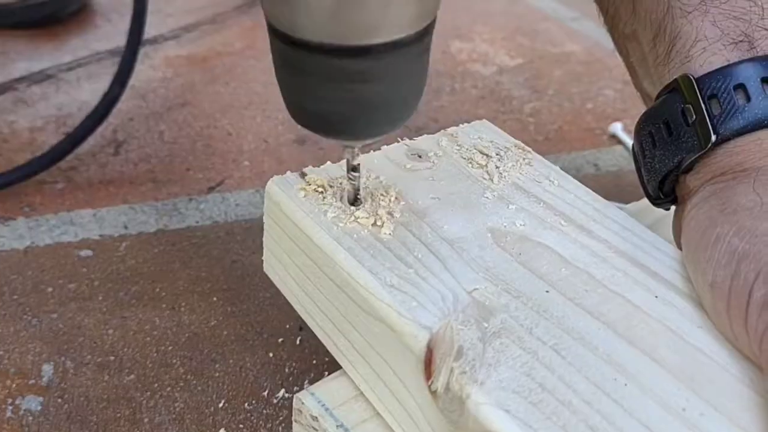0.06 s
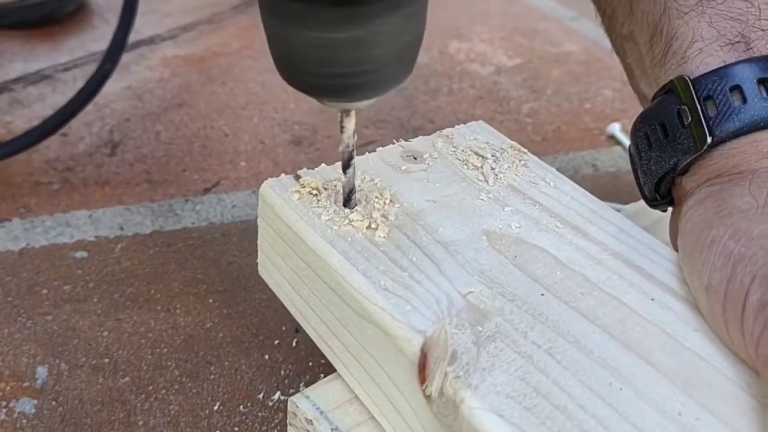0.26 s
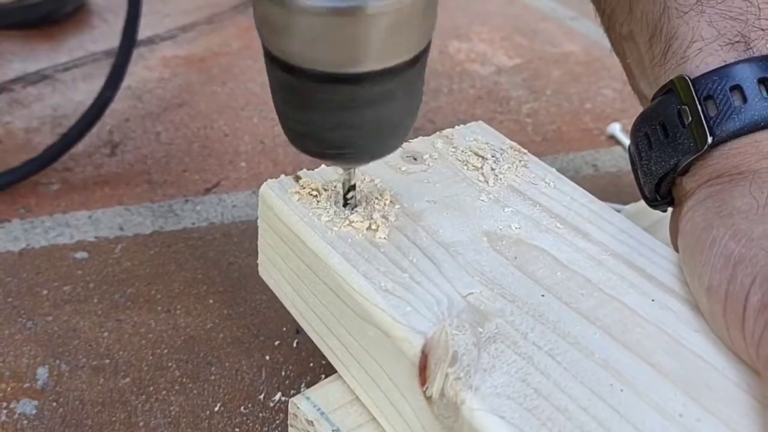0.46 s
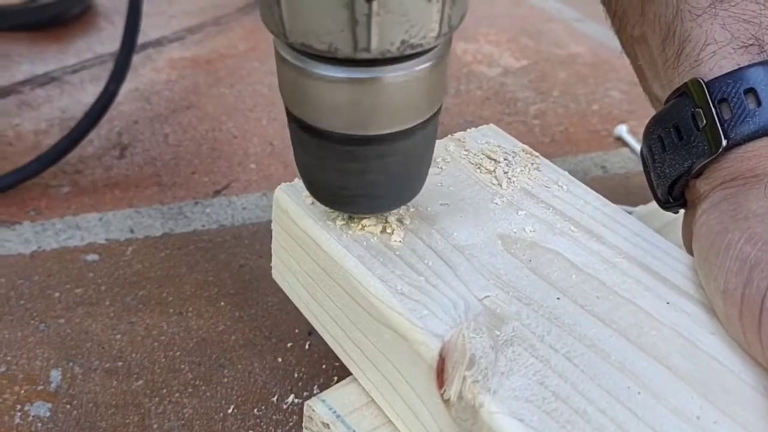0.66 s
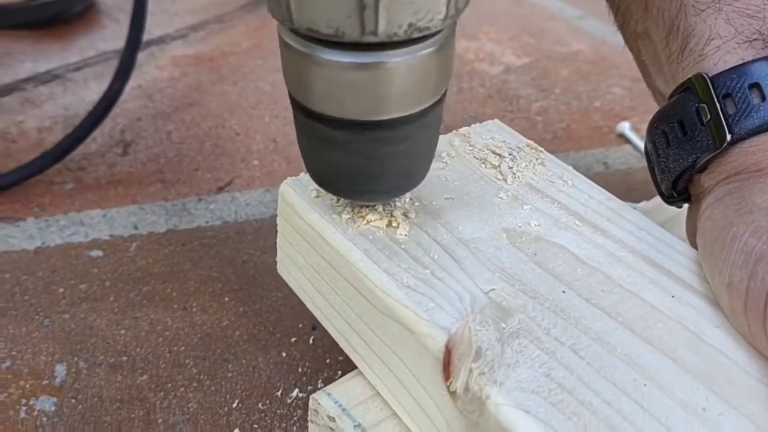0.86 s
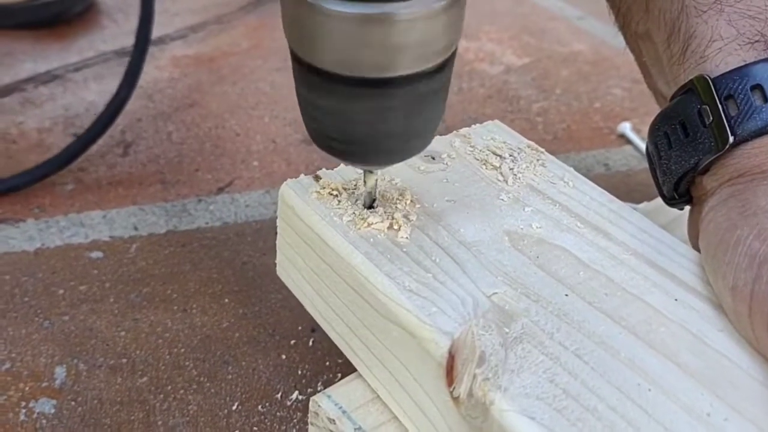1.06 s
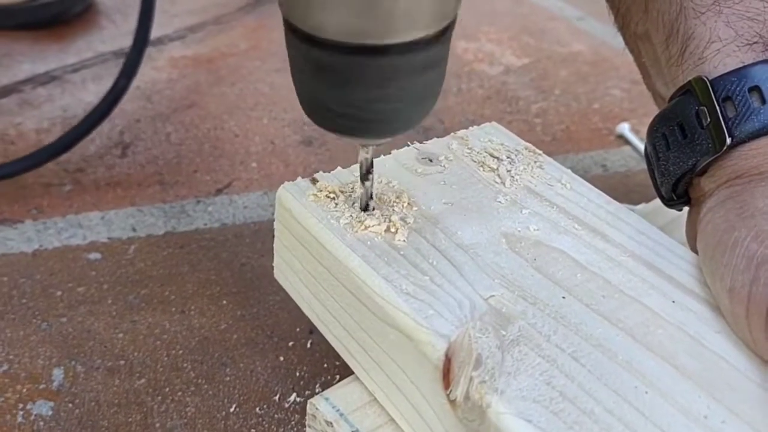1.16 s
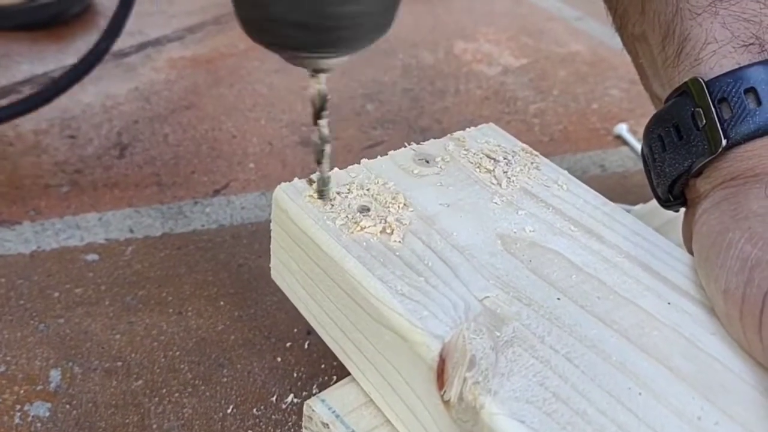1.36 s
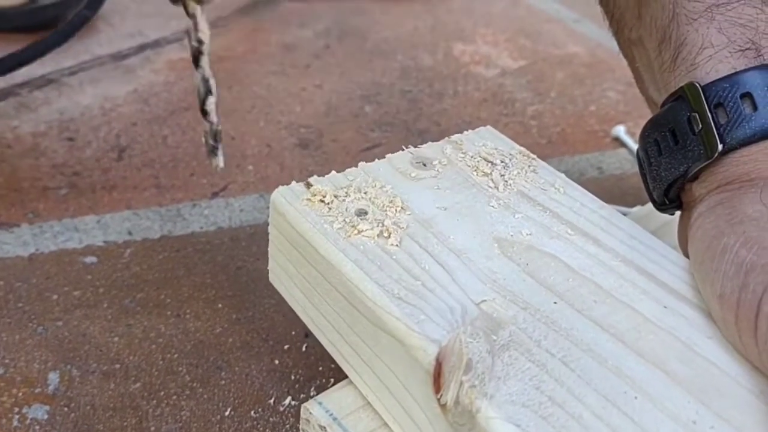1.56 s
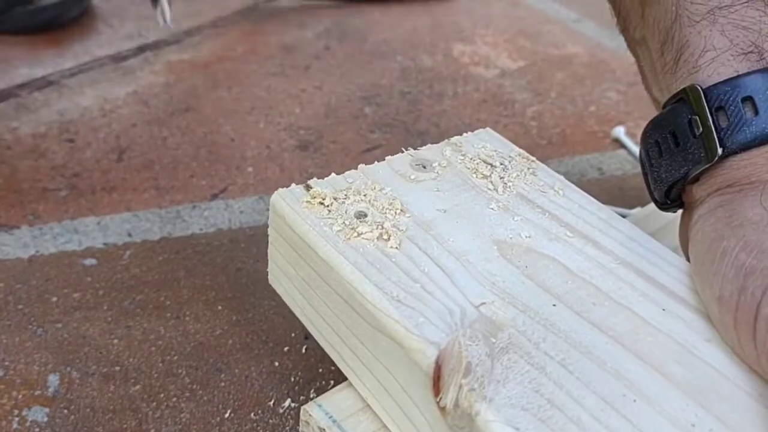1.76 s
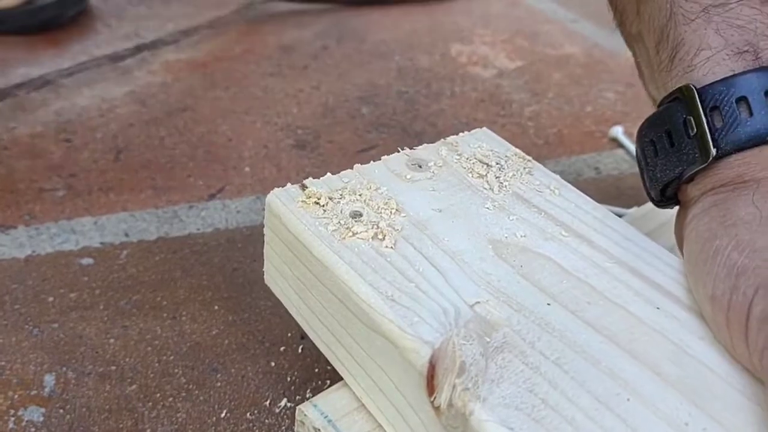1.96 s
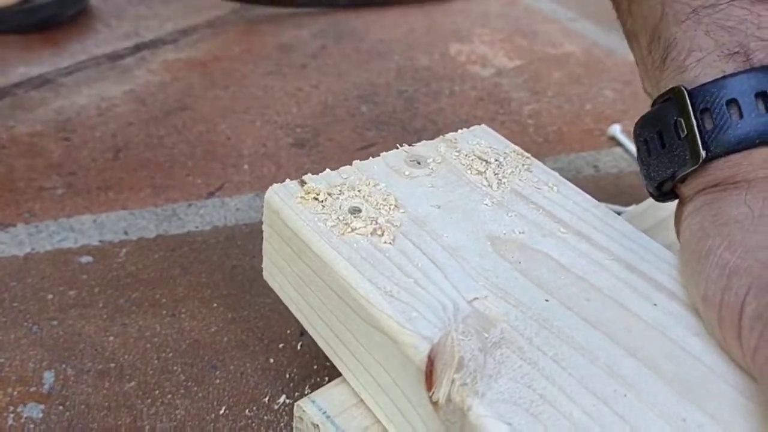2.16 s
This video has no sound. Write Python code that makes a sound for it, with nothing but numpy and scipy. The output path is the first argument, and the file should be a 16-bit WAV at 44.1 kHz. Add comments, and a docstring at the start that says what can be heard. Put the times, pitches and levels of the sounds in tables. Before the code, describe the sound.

Close electric drill boring a wooden board outdoors, dipping, revving again, then coasting to a stop.

```python
"""A sudden whirr, close by and outdoors: an electric drill running in and out of a hole in a wooden board.
It slows, picks up again and coasts to a stop. One shaft speed drives the motor whine, the gear tones
and the rattle of the housing. The chuck and bit rasp and the brushes hiss, over a low rumble and
a faint bed of air."""
import sys
import numpy as np
from scipy import signal
from scipy.fft import rfft, irfft, next_fast_len
from scipy.io import wavfile
from scipy.ndimage import map_coordinates

SR = 44100
rng = np.random.default_rng(int(sys.argv[2]) if len(sys.argv) > 2 else 0)


def materialize(psi):
    """Save the field psi as 16-bit PCM at rate SR to the path in sys.argv[1].

    A 1-D psi becomes a single channel; in a 2-D psi each row is a channel.
    """
    bounded = np.clip(np.atleast_2d(psi).T, -1, 1)
    quanta = np.round(bounded * 32767).astype(np.int16)
    wavfile.write(sys.argv[1], SR, quanta)


N = 97020
T = np.arange(N) / SR


def amp(db):
    """Decibels to gain."""
    return 10 ** (np.asarray(db) / 20)

def unit(x):
    """Scale to rms 1."""
    return x / np.sqrt(np.mean(x ** 2) + 1e-20)

def along(points, hz):
    """Read (Hz, value) points on a log frequency axis."""
    freqs, values = np.transpose(points)
    return np.interp(np.log(hz + 1), np.log(freqs + 1), values)

def curves(rows):
    """One value per sample for each column after the time."""
    times, *columns = np.transpose(rows)
    return [np.interp(T, times, column) for column in columns]

def wobble(rate):
    """A smooth random curve, rate knots a second."""
    return map_coordinates(rng.standard_normal(int(N * rate / SR) + 4), [T * rate])

def noise():
    """Two unrelated white noises."""
    return rng.standard_normal((2, N))

def filtered(x, response):
    """Filter x by a complex response of frequency."""
    size = next_fast_len(N + SR // 2)
    return irfft(rfft(x, size) * response(np.fft.rfftfreq(size, 1 / SR)), size)[..., :N]

def pan(db):
    """Left and right gains for a level difference."""
    return amp(np.array([[.5], [-.5]]) * db)

# Stereo width. Each row: frequency in Hz, left-right correlation.
EAR_LIKENESS = [(30, 0.62), (120, 0.95), (330, 1), (700, 0.75), (1400, 0.33), (2600, -0.01), (6000, -0.14),
                (14000, -0.048)]
def spread(pair):
    """Two unrelated signals become stereo: alike in the bass, unrelated in the treble."""
    def mid_side(hz):
        angle = np.arccos(np.clip(along(EAR_LIKENESS, hz), -1, 1)) / 2
        return np.array([np.cos(angle), np.sin(angle)])
    mid, side = filtered(pair, mid_side)
    return np.array([mid + side, mid - side])

# Panning of the noise layers. Each row: frequency in Hz, left minus right in dB.
BALANCE = [(500, 1), (3000, -3), (4800, 3), (6200, -1), (7300, -3), (8600, 3), (11000, 3), (13500, -1.5)]
def coloured(pair, spectrum):
    """Stereo sound of rms 1, shaped by the given spectrum."""
    return unit(filtered(spread(pair), lambda hz: amp(along(spectrum, hz)) * pan(along(BALANCE, hz))))

def scattered(x, echo_db=-5, t60_s=.037):
    """Add a short dense scatter off the board and the ground, different at each ear."""
    t = np.arange(SR // 16) / SR
    tail = rng.standard_normal((2, len(t))) * amp(-60 * t / t60_s)
    echo = signal.fftconvolve(x, tail / np.linalg.norm(tail[0]), axes=1)[:, :N]
    return unit(x + amp(echo_db) * echo)

def tone(turns, order, flutter, rate, ear_phase_rad=.7):
    """A tone at order times the shaft speed, fluttering in level and phase at each ear."""
    sway = [np.exp(1j * rng.normal(0, ear_phase_rad)) + flutter * (wobble(rate) + 1j * wobble(rate))
            for _ in range(2)]
    return unit(np.real(np.array(sway) * np.exp(2j * np.pi * order * turns)))

def radiated(levels, hz, cut_hz):
    """Gain of a tone at its pitch, falling away steeply below the cut."""
    return amp(along(levels, hz)) / np.sqrt(1 + (cut_hz / hz) ** 10)


# Colour of the air bed. Each row: frequency in Hz, relative level in dB.
AIR_SPECTRUM = [(15, -50), (25, -26), (89, -2.5), (445, -10.5), (684, -14), (3830, -15.5), (12500, -18)]
def outdoor_air(level_db=-75.5):
    """A faint, even wash of outdoor air."""
    return amp(level_db) * coloured(noise(), AIR_SPECTRUM)

# Colour of the drone. Each row: frequency in Hz, relative level in dB.
DRONE_SPECTRUM = [(30, -35), (70, -2.5), (110, 0), (230, 0), (280, -16), (370, -6), (500, -13),
                  (1200, -27.5)]
def drone(level_db=-68.5):
    """Faint, steady low noise under the drill."""
    return amp(level_db) * coloured(noise(), DRONE_SPECTRUM)

# Colour of the rumble. Each row: frequency in Hz, relative level in dB.
RUMBLE_SPECTRUM = [(25, -38), (45, -40), (90, -8), (160, -5.5), (250, 2), (370, 7), (500, -1), (700, 3),
                   (1200, -21)]
def rumble(rattle_db, follow=.78):
    """Low noise that swells and sinks with the rattle."""
    level_db = -52 + follow * (rattle_db - rattle_db.max()) + wobble(25.33)
    return amp(level_db) * coloured(noise(), RUMBLE_SPECTRUM)

# Hum level by pitch. Each row: pitch in Hz, level in dB before the low cut.
HUM_LEVELS = [(190, -67), (220, -61.5), (260, -58.5), (320, -58), (355, -52.5), (378, -57), (420, -58.5)]
def shaft_hum(speed, turns):
    """A wavering hum, one cycle per turn of the shaft."""
    gain = radiated(HUM_LEVELS, speed, cut_hz=195) * amp(1.6 * wobble(25.1))
    return gain * np.sqrt(2) * np.sin(2 * np.pi * turns)

# Ring level by pitch. Each row: pitch in Hz, level in dB.
RING_LEVELS = [(800, -87), (1000, -71), (1230, -61.5), (1420, -70), (1660, -54.5), (1850, -68), (2150, -53),
               (2500, -82)]
def gear_ring(speed, turns, order=13.88):
    """One gear tone that sings out while the drill coasts."""
    level_db = along(RING_LEVELS, order * speed) + wobble(40)
    return amp(level_db) * np.sqrt(2) * np.sin(2 * np.pi * order * turns)

# Fader ride of the brushes. Each row: time in seconds, level in dB.
BRUSH_LEVELS = [(.2, -43.5), (.7, -39.5), (.9, -38), (1.3, -36), (1.6, -33.5), (1.76, -40), (1.93, -42.5),
                (2.02, -42.5), (2.06, -50), (2.15, -53)]
# Colour of their hiss. Each row: frequency in Hz, relative level in dB.
BRUSH_SPECTRUM = [(1000, -21.5), (2400, -4), (3700, -33), (4700, 0), (6500, 9), (8300, 4.5), (10000, 6.5),
                  (11300, 1.5), (12600, 5.5), (13800, 7), (14600, -2), (15600, -13)]
def brush_hiss():
    """The motor brushes rub with a bright, flickering hiss."""
    level_db, = curves(BRUSH_LEVELS)
    return amp(level_db + 1.3 * wobble(70)) * scattered(coloured(noise(), BRUSH_SPECTRUM))

# How loudly the whine radiates. Each row: pitch in Hz, level in dB before the low cut.
WHINE_LEVELS = [(5400, -58), (6100, -46), (6800, -42), (7400, -37.5), (7900, -32.5), (8600, -32.5),
                (9200, -44), (10300, -37), (11500, -35), (13500, -33.5), (15500, -34)]
def motor_whine(speed, turns, order=40):
    """The motor's high, wavering whine: a clear core with a rough edge."""
    core = tone(turns, order, flutter=.55, rate=70)
    edge = amp(-11) * tone(turns, order, flutter=1.9, rate=250)
    waver = amp(2.2 * wobble(59.74))
    return radiated(WHINE_LEVELS, order * speed, cut_hz=5200) * unit(waver * (core + edge))

# Gear and bearing tones. Each row: multiple of the shaft speed, relative level in dB.
MESH_TONES = [(7.94, -21), (12.31, -18.5), (13.27, -22.5), (13.88, -22.5), (17.44, -26), (18.5, -25),
              (24.62, -17), (27.16, -20.5), (36.9, -17), (49.15, -18), (54.8, -19), (61.55, -16),
              (73.88, -14), (86.17, -15.5)]
# How well the housing radiates them. Each row: frequency in Hz, gain in dB.
MESH_RADIATION = [(700, -14), (1100, -8), (1550, -4), (1850, -12), (2200, 7.5), (2500, -5), (3000, 3),
                  (3500, 0), (3850, -4), (4200, 2), (4750, 2.5), (5300, -2), (6200, 6), (7500, -3),
                  (8500, -7), (9500, -3), (11000, -7), (15000, -17), (17000, -82)]
def gear_tones(speed, turns, slack_hz=150, stall_hz=85):
    """Mesh tones sweep through the housing's resonances, roughen as the gears run slack, die at stall."""
    stall_fade = 1 / np.sqrt(1 + (stall_hz / speed) ** 10)
    jitter_rad = .36 * np.maximum(slack_hz / speed, 1)
    total = 0
    for order, db in MESH_TONES:
        backlash = jitter_rad * wobble(170) / (2 * np.pi * order)
        level_db = db + along(MESH_RADIATION, order * speed) + 2.4 * wobble(23.93)
        total += amp(level_db) * tone(turns + backlash, order, flutter=.35, rate=40)
    return stall_fade * total

def tooth_ticks(turns, per_turn=12.31, scatter_db=2.5):
    """One tick of random size per gear tooth, loosely timed."""
    count = int(turns[-1] * per_turn)
    timing, *sizes = rng.standard_normal((count, 3)).T
    tick_turns = (np.arange(count) + .3 * timing) / per_turn
    at = np.interp(tick_turns, turns, np.arange(N)).astype(int)
    strengths = [rng.choice([-1, 1], count) * amp(scatter_db * size) for size in sizes]
    return unit(np.array([np.bincount(at, strength, N) for strength in strengths]))

# Housing resonances. Each row: centre in Hz, width in Hz, relative level in dB, left minus right in dB.
HOUSING_MODES = [(867, 243, -11.5, 0.5), (1083, 96, 1, 1.5), (1211, 55, -2.5, 4.5), (1490, 172, -2.5, 6),
                 (1682, 160, -6.5, 2.5), (2275, 91, -12, 6), (3075, 102, -2, 1.5), (3117, 57, -13.5, -16),
                 (3340, 180, -13.5, 7), (4000, 73, -22, -12), (4746, 69, -5.5, -11.5),
                 (5713, 104, -2.5, -6), (6450, 110, -13, -6), (7600, 190, -4, 1.5)]
def housing(hz):
    """Response of the housing: its resonances added with alternating signs."""
    return sum((-1) ** k * amp(db) * pan(lean) * 1j * hz * width / (centre**2 - hz**2 + 1j * hz * width)
               for k, (centre, width, db, lean) in enumerate(HOUSING_MODES))

def housing_peaks(hz):
    """The same response, narrowed to its strongest peaks."""
    response = housing(hz)
    return (np.abs(response) / np.abs(response).max()) ** 2 * response

# Slow gear tones that shake the housing. Each row: multiple of the shaft speed, relative level in dB.
SHAKE_TONES = [(3.06, -18), (3.62, -27), (4.82, -21.5), (6.34, -25)]
def housing_rattle(turns):
    """Gear teeth rattle the housing; slow gear tones make it sing as they pass its peaks."""
    throb = sum(amp(db) * tone(turns, order, flutter=.35, rate=50)[0] for order, db in SHAKE_TONES)
    chatter = spread(tooth_ticks(turns) + .5 * noise())
    return unit(filtered(chatter, housing) + filtered(throb, housing_peaks))

# Colour of the rasp. Each row: frequency in Hz, relative level in dB.
RASP_SPECTRUM = [(60, -50), (500, -28.5), (800, -6.5), (1300, -20.5), (1900, -3), (2500, -5.5),
                 (3200, -1.5), (3700, -1.5), (4500, -2), (5200, -2.5), (6000, 2.5), (6800, 0), (7700, -7),
                 (8800, -9), (11000, -10.5), (15500, -28)]
def rasp(turns):
    """Dense, uneven scraping of gears, chuck and bit."""
    flicker = amp(1.08 * wobble(89.64))
    grit = .78 * tooth_ticks(turns) + noise()
    return flicker * scattered(coloured(grit, RASP_SPECTRUM))

# Speed of the motor shaft. Each row: time in seconds, turns per second.
SHAFT_SPEED = [(.19, 407.5), (.25, 417.5), (.3, 402.5), (.4, 356.2), (.52, 309), (.65, 263.9), (.78, 221.4),
               (.81, 218.4), (.86, 266.5), (.92, 309.9), (.98, 339.8), (1.03, 356), (1.15, 306.5),
               (1.3, 253.7), (1.5, 196.1), (1.7, 146.3), (1.9, 105), (2.15, 62.8)]
# Fader rides. Each row: time in seconds, relative rattle level in dB, relative scrape level in dB.
DRILL_LEVELS = [(0.21, -42, -31.5), (0.226, -39, -32.5), (0.57, -37.5, -35), (0.574, -35, -33),
                (0.73, -37.5, -33), (0.742, -36, -37), (0.812, -37, -31), (0.946, -34.5, -32),
                (0.972, -40.5, -32.5), (1.026, -35.5, -32), (1.096, -39, -32.5), (1.364, -36, -33),
                (1.418, -40.5, -36.5), (1.466, -37.5, -36), (1.864, -53, -48), (1.924, -61, -52),
                (1.994, -65, -50.5), (2.14, -65.5, -56)]
def drill(start_s=.195, attack_s=.0054, stop_s=2.154, release_s=.007):
    """All parts of the drill around one turning shaft, gated from its abrupt start to its stop."""
    speed, = curves(SHAFT_SPEED)
    turns = np.cumsum(speed * (1 + .0012 * wobble(40))) / SR
    rattle_db, scrape_db = curves(DRILL_LEVELS)
    rattle = amp(rattle_db + 2.5 + .78 * wobble(60.53)) * housing_rattle(turns)
    scrape = amp(scrape_db) * (amp(2) * rasp(turns) + amp(4) * gear_tones(speed, turns))
    noises = brush_hiss() + rumble(rattle_db) + drone()
    tones = motor_whine(speed, turns) + shaft_hum(speed, turns) + gear_ring(speed, turns)
    attack = np.clip((T - start_s) / attack_s, 0, 1)
    release = np.exp(-np.maximum(T - stop_s, 0) / release_s)
    return attack * release * (rattle + scrape + noises + tones)

def scene():
    """The drill over faint outdoor air."""
    return drill() + outdoor_air()

TOP_HZ = 15900
def record(dry):
    """A brick-wall low-pass trims the very top."""
    return filtered(dry, lambda hz: hz < TOP_HZ)


dry = scene()
out = record(dry)
materialize(out)
```